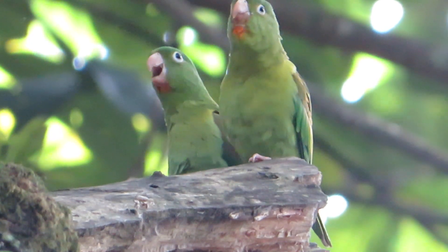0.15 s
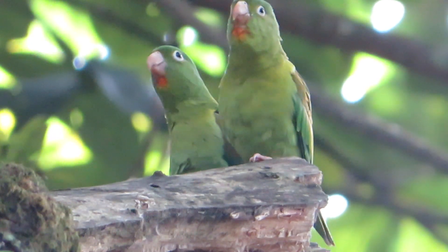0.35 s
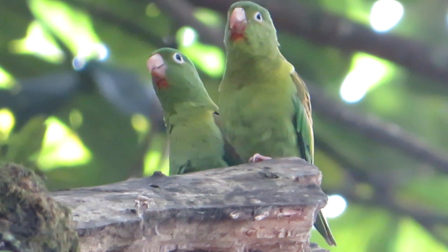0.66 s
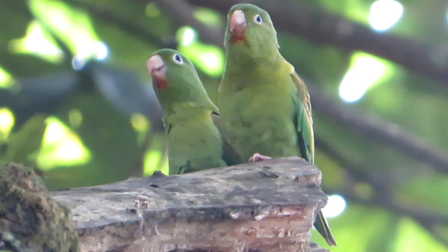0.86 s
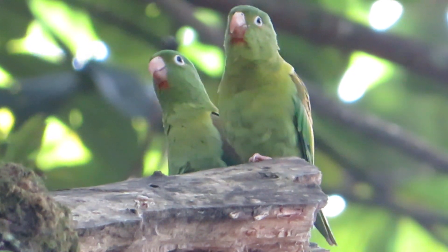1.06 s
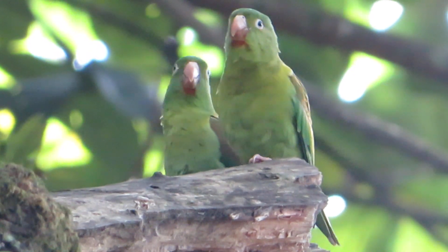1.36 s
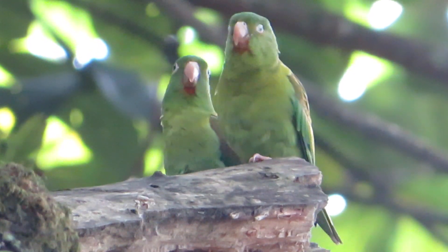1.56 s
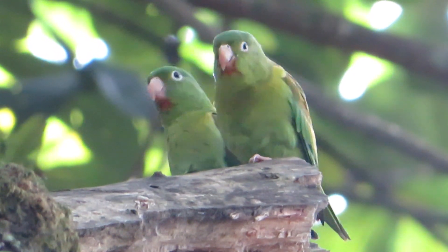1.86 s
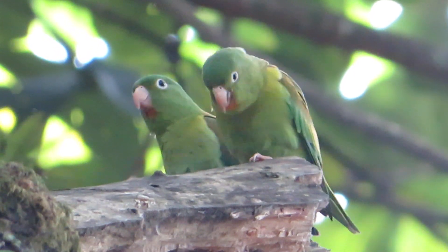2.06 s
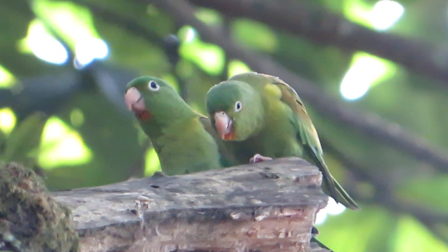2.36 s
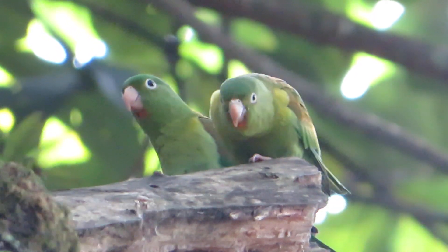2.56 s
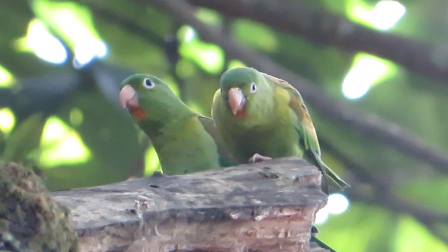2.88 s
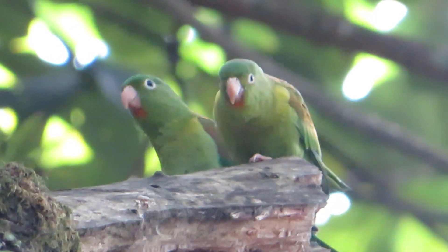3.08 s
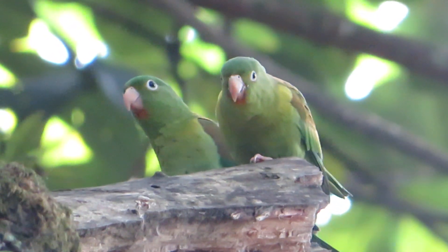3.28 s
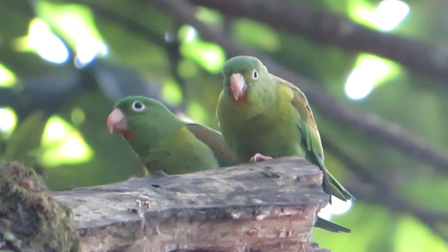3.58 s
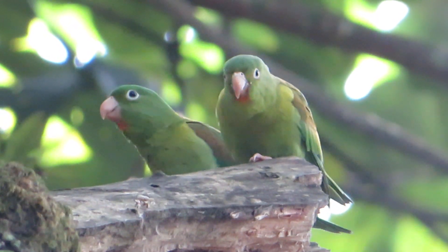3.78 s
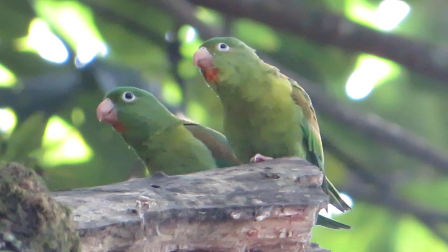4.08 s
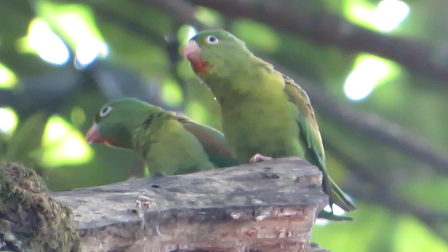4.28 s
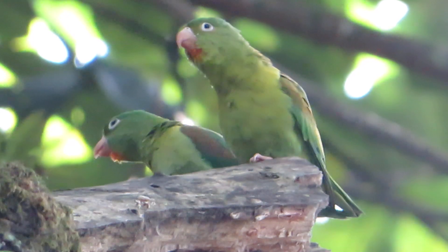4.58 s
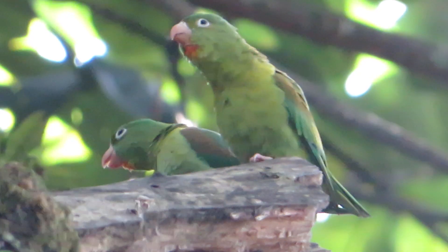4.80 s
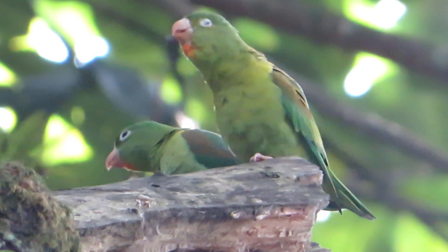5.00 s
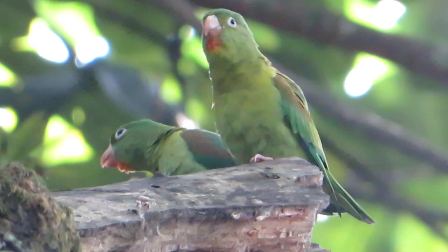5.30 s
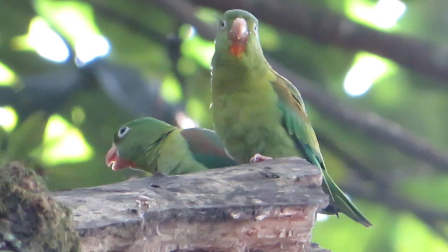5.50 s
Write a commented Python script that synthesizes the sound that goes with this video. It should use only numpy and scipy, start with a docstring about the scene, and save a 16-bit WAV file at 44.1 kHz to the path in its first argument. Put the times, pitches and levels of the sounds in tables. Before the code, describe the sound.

Small parakeets give harsh raspy screeches, shrill yelps and a long thin whistle in an echoing forest, over a soft low rumble.

```python
"""Small parakeets in a forest, over a low rumble with a slowly fading drone and a soft wash of air. First come a
far screech, low nasal calls and soft chirps in front, then harsh screeches and shrill yelps on the right. Thin
peeps, a click and far screeches lead to two more screeches; then faint hoots and more nasal calls, and on the
left a long whistle (with a click) and an arched squeal, as a last screech breaks out on the right. Each call is a
stack of harmonics, shaken when rough, shaped by a throat and scattered by the trees into a long tail of echoes."""
import sys
import numpy as np
from scipy import signal
from scipy.fft import rfft, irfft, next_fast_len
from scipy.io import wavfile

SR = 44100
rng = np.random.default_rng(int(sys.argv[2]) if len(sys.argv) > 2 else 0)


def materialize(psi):
    """Save the field psi as 16-bit PCM at rate SR to the path in sys.argv[1].

    A 1-D psi becomes a single channel; in a 2-D psi each row is a channel.
    """
    bounded = np.clip(np.atleast_2d(psi).T, -1, 1)
    quanta = np.round(bounded * 32767).astype(np.int16)
    wavfile.write(sys.argv[1], SR, quanta)


N = 249165
TIME = np.arange(N) / SR
SIDES = np.array([[1], [-1]]) / 2   # left, right


def from_db(db):
    """Turn decibels into a gain."""
    return 10 ** (np.asarray(db) / 20)


def rms_one(x):
    """Scale to an rms (average strength) of 1."""
    return x / np.sqrt(np.mean(x ** 2) + 1e-20)


def bin_hz(size):
    """Frequency of each bin of a real spectrum."""
    return np.arange(size // 2 + 1) * SR / size


def at_hz(points, hz):
    """Read a table between its points, on a log-frequency axis."""
    f, value = np.transpose(points)
    return np.interp(np.log(np.maximum(hz, 1)), np.log(f), value)


def wander(rate_hz, size):
    """Random motion of rms 1, weaker and weaker above the given rate."""
    smoothing = 1 + (bin_hz(size) / rate_hz) ** 2
    return rms_one(irfft(rfft(rng.standard_normal(size)) / smoothing, size))


# how alike sound from all round is on the left and right: (f/Hz, correlation)
LEFT_RIGHT_LIKENESS = [(30, .998), (60, 1), (130, 0.99), (270, 0.93), (1000, 0.96), (3000, 0.88),
                       (6000, 0.65), (12000, 0.48)]


def diffuse(spectrum, size):
    """Noise from all round at two nearby points: alike in the bass, less so in the treble."""
    hz = bin_hz(size)
    mid, side = rfft(rng.standard_normal((2, size)))
    alike = np.clip(at_hz(LEFT_RIGHT_LIKENESS, hz), 0, 1)
    pair = np.sqrt(1 + alike) * mid + np.sqrt(1 - alike) * side * [[1], [-1]]
    return rms_one(irfft(pair * from_db(at_hz(spectrum, hz)), size))


def tone(pitch, waver, waver_hz, swell_db):
    """A low sine whose pitch and level waver; rms 1."""
    phase = 2 * np.pi * np.cumsum(pitch * (1 + waver * wander(waver_hz, N))) / SR
    return rms_one(np.sin(phase) * from_db(swell_db * wander(waver_hz, N)))


# time for echoes to die by 60 dB: (f/Hz, t/s)
ECHO_DECAY = [(1000, 0.68), (3000, 1.02), (4500, 1.42), (7000, 0.8), (13000, 0.54)]


def forest_echo(early_db, early_s, gap_s, lumpy_db=1.5):
    """Trunks and leaves scatter sound: near echoes, then a tail that dies at its own pace in each band."""
    t = TIME[:SR]
    lumps = from_db(lumpy_db * wander(150, SR))
    scatter = diffuse([(1000, 4.0), (4300, 2.5), (6500, 1.0), (12000, 1.0)], SR) * lumps
    centres, hz = np.geomspace(1000, 14000, num=7), bin_hz(SR)
    tail = 0
    for centre, share in zip(centres, np.eye(len(centres))):
        band = irfft(rfft(scatter) * np.interp(hz, centres, share), SR)
        tail = tail + band * from_db(-60 * t / at_hz(ECHO_DECAY, centre))
    near_boost = 1 + from_db(early_db) * np.exp(-t / early_s)
    tail = tail * near_boost * (1 - np.exp(-t / gap_s))
    # unit gain from 2500 to 5000 Hz, where the birds are loudest
    return tail / np.sqrt(np.mean(np.abs(rfft(tail)[:, 2500:5000]) ** 2))


ECHO_LEAN = 0.45   # share of the caller's direction that its echoes keep


def place(x, echo, lead_us, pan_db, direct_db, echo_db):
    """Direct sound reaches the left earlier by lead_us; echoes come from all round, leaning the same way."""
    size = next_fast_len(N + SR)
    turn = 2j * np.pi * bin_hz(size) * SIDES * lead_us / 1e6
    direct = from_db(direct_db + pan_db * SIDES) * np.exp(turn)
    echo_gain = from_db(echo_db + ECHO_LEAN * pan_db * SIDES)
    scattered = echo_gain * np.exp(ECHO_LEAN * turn) * rfft(echo, size)
    return irfft(rfft(x, size) * (direct + scattered), size)[:, :N]


CUTOFF_HZ = 15100   # top of the harmonics and of the whole sound
WOBBLE, WOBBLE_HZ = 0.0298, 91.3   # slower pitch shake at full roughness: share of pitch, speed
PULSE_DB, PULSE_HZ = 2, 220   # level stutter of all harmonics together: depth at full roughness, speed


def syrinx(call, throat, jitter, jitter_hz, flutter_db, subtone):
    """A bird's voice box: harmonics; roughness shakes pitch and level and adds tones at half steps between."""
    start, pitch, level, rough = call
    size, rough = len(pitch), np.clip(rough, 0, 1)
    shake = jitter * wander(jitter_hz, size) + WOBBLE * wander(WOBBLE_HZ, size)
    phase = 2 * np.pi * np.cumsum(pitch * (1 + rough * shake)) / SR
    orders = np.arange(2, 25)[:, None] / 2   # 1, 1.5, 2 ... 12 times the pitch
    flutter = np.array([rms_one(from_db(flutter_db * rough * np.tanh(wander(jitter_hz, size))))
                        for _ in orders])
    weight = np.where(orders % 1, subtone * rough ** 2, 1) * (orders * pitch < CUTOFF_HZ)
    sines = np.sin(orders * phase + rng.uniform(0, 2 * np.pi, orders.shape))
    wave = np.sum(weight * flutter * sines, axis=0)
    wave = wave * rms_one(from_db(PULSE_DB * rough * np.tanh(wander(PULSE_HZ, size))))
    # make up beforehand for what the throat will do to the level
    passed = np.sqrt(np.sum((weight * from_db(at_hz(throat, orders * pitch))) ** 2, axis=0) / 2)
    soft_ends = signal.windows.tukey(size, min(1, 200 / size))
    source = wave / passed * from_db(level) * soft_ends
    # the extra second in front lets a call begin before time zero
    return np.pad(source, (SR + int(start * SR), N))[SR:SR + N]


def bird(calls, throat, jitter, jitter_hz, flutter_db, subtone):
    """All the calls of one voice, filtered by its throat and beak."""
    source = sum(syrinx(call, throat, jitter, jitter_hz, flutter_db, subtone) for call in calls)
    size = next_fast_len(N + 2000)
    return irfft(rfft(source, size) * from_db(at_hz(throat, bin_hz(size))), size)[:N]


FADE_DB = 15   # how far a note's level falls at its ends


def envelope_db(age, attack_s, release_s):
    """Attack, hold and release, in dB relative to the held level."""
    attack = np.maximum(0, 1 - age / attack_s)
    release = np.maximum(0, 1 - (age[-1] - age) / release_s)
    return -FADE_DB * (attack + release)


BOW_SKEW = .75   # below 1, the bend in a glide peaks early


def note(row, attack_s, release_s):
    """One glide bent like a bow, as (start, pitch, level, roughness)."""
    start, length, from_hz, to_hz, bow_hz, db, rough = row
    age = TIME[:int(length * SR)]
    along = age / length
    pitch = from_hz + (to_hz - from_hz) * along + bow_hz * np.sin(np.pi * along ** BOW_SKEW)
    return start, pitch, db + envelope_db(age, attack_s, release_s), np.full(len(age), rough)


BREAK_S = .0045   # between points closer than this the pitch jumps instead of gliding


def course(points):
    """A call that runs through its points of pitch, level and roughness; the pitch jumps at each break."""
    s, pitch, level, rough = np.transpose(sorted(points))
    t = s[0] + TIME[:int((s[-1] - s[0]) * SR)]
    last = np.searchsorted(s, t, side="right") - 1
    is_break = np.diff(s)[last] < BREAK_S
    pitch = np.where(is_break, pitch[last], np.interp(t, s, pitch))
    return s[0], pitch, np.interp(t, s, level), np.interp(t, s, rough)


# colour of the steady rumble: (f/Hz, relative level/dB per Hz)
RUMBLE_COLOUR = [(15, -30), (25, -20.5), (54, 1.5), (108, -1), (139, -2), (172, -8), (267, -9), (335, -14),
                 (470, -18.5), (500, -18.5), (650, -42), (1100, -120)]


def low_rumble(level_db=-38, swell_db=1.5, swell_hz=3):
    """Low noise from all round that swells gently at random."""
    return diffuse(RUMBLE_COLOUR, N) * from_db(level_db + swell_db * wander(swell_hz, N))


# course of the drone as it settles and fades: (t/s, f/Hz, level/dB)
DRONE_COURSE = [(0, 146.1, -41), (0.449, 158, -40), (0.748, 141.3, -43), (2.9, 141.1, -43),
                (4.1, 139.9, -55.5), (5.65, 146.7, -61)]
# colour of the low noise around it: (f/Hz, relative level/dB per Hz)
DRONE_NOISE_COLOUR = [(60, -30), (110, 0), (290, -3), (450, -30), (1100, -120)]


def fading_drone(noise_db=-4):
    """A wavering low sine, with low noise that fades along with it."""
    s, pitch, level = np.transpose(DRONE_COURSE)
    level_db = np.interp(TIME, s, level)
    drone = tone(np.interp(TIME, s, pitch), waver=0.0349, waver_hz=10.0, swell_db=2.0)
    hum = diffuse(DRONE_NOISE_COLOUR, N) * from_db(level_db + noise_db)
    return drone * from_db(level_db) + hum


# colour of the air: (f/Hz, relative level/dB per Hz)
AIR_COLOUR = [(350, 0.5), (600, 1.5), (1100, -1), (1600, -6.5), (2500, -9), (4000, -16), (6000, -21),
              (9000, -30.5), (12000, -39), (15000, -50)]


def air_wash(level_db=-43):
    """A soft wash of noise from all round, weaker toward the treble."""
    return diffuse([(100, -6.0)] + AIR_COLOUR, N) * from_db(level_db)


# faint far tones: (start t/s, length t/s, from f/Hz, to f/Hz, level/dB)
FAR_HOOTS = [(3.702, 0.37, 455, 445, -46.5), (4.05, .22, 472, 462, -49.5)]


def hoots(fade_s=0.035):
    """Wavering sines that sink a little in pitch, with a swell at the start and a fade at the end."""
    out = 0
    for start, length, from_hz, to_hz, db in FAR_HOOTS:
        pitch = np.interp(TIME, [start, start + length], [from_hz, to_hz])
        swell = np.clip(np.minimum(TIME - start, start + length - TIME) / fade_s, 0, 1)
        out = out + from_db(db) * swell * tone(pitch, waver=0.0041, waver_hz=8.6, swell_db=0.5)
    return out


def background(pan_db=0.7):
    """Rumble, drone and hoots a touch louder on the left, plus the air."""
    return (low_rumble() + fading_drone() + hoots()) * from_db(pan_db * SIDES) + air_wash()


# small dry clicks: (t/s, knock level/dB, snap level/dB)
CLICKS = [(2.260, -19.5, -28), (4.657, -45, -37)]


def clicks(knock_s=0.00025, snap_s=.0004, snap_top_hz=6000):
    """A snap of dying noise and a small dull one-way pulse, starting together."""
    out = np.zeros(N)
    for s, knock_db, snap_db in CLICKS:
        age = TIME[TIME >= s] - s
        burst = rng.standard_normal(len(age)) * np.exp(-age / snap_s)
        snap = signal.lfilter(*signal.butter(1, snap_top_hz, fs=SR), burst)
        knock = (age / knock_s * np.exp(1 - age / knock_s)) ** 2
        out[N - len(age):] += from_db(snap_db) * snap - from_db(knock_db) * knock
    return out


# Call tables below: levels are those before a call is placed; roughness above 1 counts as 1.
# low nasal calls: (start t/s, length t/s, from f/Hz, to f/Hz, bow f/Hz, level/dB, roughness 0-1)
NASAL_NOTES = [ (0.159, 0.052, 1020, 895, 109.5, -44, 0.14), (.222, 0.051, 993, 953, -10, -47, 0.39),
               (.485, 0.048, 950, 784, 21.5, -47, .4), (3.928, 0.03, 1077, 960, -15.5, -47.5, 0.2),
               (4.302, 0.06, 1045, 1020, 17, -49.5, 0.22), (4.362, 0.039, 1011, 899, 7.5, -51.5, .3),
               (4.680, 0.051, 1024, 1046, 35.5, -48, 0.35), (5.028, 0.04, 1037, 977, 1, -47.5, 0.31),
               (5.07, .06, 999, 896, 29.5, -43.5, 0.63), (5.143, 0.032, 1038, 986, -9, -42.5, 0.22),
               (5.2, 0.074, 1000, 1000, 12.5, -50.5, 0.35), (5.322, 0.057, 1063, 1075, 23.5, -45.5, 0.25)]
# what the throat and beak let through: (f/Hz, level/dB)
NASAL_FILTER = [(1000, -7), (1700, -9), (2050, 3), (3100, 4), (4100, -3.5), (5000, -13.5), (6200, -13),
                (7200, -25), (12000, -39)]


def nasal_calls(echo):
    """Short low glides from further off, whose upper harmonics the throat favours."""
    calls = bird([note(row, attack_s=0.0054, release_s=0.0018) for row in NASAL_NOTES],
                 NASAL_FILTER, jitter=0.058, jitter_hz=400, flutter_db=17.0, subtone=1.0)
    return place(calls, echo, lead_us=5, pan_db=0.0, direct_db=4.0, echo_db=6.0)


# screeches from deeper in the trees, each a list of (t/s, f/Hz, level/dB, roughness)
FAR_COURSES = [
    [(-.012, 2051, -44, 0.4), (0, 2024, -33, 0.47), (.03, 2010, -41.5, 0.44), (.057, 2060, -47, 1.5)],
    [(2.535, 1250, -55, 0.3), (2.572, 1400, -48, 0.5), (2.575, 2120, -43, 0.21), (2.603, 2044, -44, 0.34),
     (2.606, 1400, -46.5, 0.48), (2.64, 1306, -49, 0.56)],
    [(2.76, 1320, -51, .45), (2.8, 1420, -47, 0.5), (2.803, 2095, -42, 0.28), (2.84, 2018, -44, 0.5),
     (2.881, 2037, -46.5, 0.6), (2.884, 1454, -47, 0.41), (2.934, 1360, -43.5, 0.33)],
    [(5.235, 1970, -49, 0.3), (5.255, 2018, -46, .25), (5.31, 2002, -44, .2), (5.325, 2000, -48, .3)],
]
# what the throat and beak let through: (f/Hz, level/dB)
FAR_FILTER = [(1000, -17), (1500, -11), (2050, -2), (2400, 4), (2900, 7), (3500, 9), (4100, 4), (4900, 5),
              (6200, -10), (7000, -13), (8200, -18.5), (12000, -36)]


def far_screeches(echo):
    """Rough far cries, some with breaks in pitch, whose echoes are louder than their direct sound."""
    calls = bird([course(points) for points in FAR_COURSES],
                 FAR_FILTER, jitter=0.088, jitter_hz=424, flutter_db=14.0, subtone=1.0)
    return place(calls, echo, lead_us=4, pan_db=0.0, direct_db=0.5, echo_db=4.5)


# thin high peeps: (start t/s, length t/s, from f/Hz, to f/Hz, bow f/Hz, level/dB, roughness 0-1)
PEEP_NOTES = [(2.064, 0.042, 3950, 4280, 400, -50, 0.58), (2.228, 0.072, 2654, 2760, 240, -51, 0.18),
              (2.288, 0.062, 2830, 2800, 110, -54, 0.2), (4.230, 0.041, 4900, 4230, 80, -56.5, 0.31)]
# what the throat and beak let through: (f/Hz, level/dB)
PEEP_FILTER = [(2800, 0), (4500, -6.5), (5900, 4.5), (9200, -11), (11500, -25), (15000, -50)]


def far_peeps(echo):
    """Short, high bowed glides from afar."""
    calls = bird([note(row, attack_s=0.012, release_s=0.014) for row in PEEP_NOTES],
                 PEEP_FILTER, jitter=0.057, jitter_hz=254, flutter_db=27.0, subtone=0.35)
    return place(calls, echo, lead_us=28, pan_db=-1.0, direct_db=0.0, echo_db=1.5)


# soft chirps: (start t/s, length t/s, from f/Hz, to f/Hz, bow f/Hz, level/dB, roughness 0-1)
CHIRP_NOTES = [(0.299, 0.029, 2905, 1934, -270, -37.5, .34), (.355, 0.014, 1693, 2280, -60, -40, .4),
               (.364, 0.036, 2466, 2130, 70, -45, 0.32), (0.401, .034, 1863, 1545, -49, -38.5, 0.34)]
# what the throat and beak let through: (f/Hz, level/dB)
CHIRP_FILTER = [(1500, -5), (2400, -10), (2800, -7), (3400, 11), (4300, -2.5), (5400, -5.5), (6300, -15.5),
                (7500, -18), (9000, -22), (11500, -29), (13000, -37), (15000, -45)]


def soft_chirps(echo):
    """Quick glides, most of them falling, from the perched pair in front."""
    calls = bird([note(row, attack_s=0.0041, release_s=0.0031) for row in CHIRP_NOTES],
                 CHIRP_FILTER, jitter=0.027, jitter_hz=400, flutter_db=2.0, subtone=0.52)
    return place(calls, echo, lead_us=13.0, pan_db=0.0, direct_db=3.0, echo_db=2.5)


# long pure whistle: (t/s, f/Hz, level/dB)
WHISTLE_COURSE = [(4.459, 3240, -44), (4.474, 3587, -33), (4.497, 3704, -43.5), (4.526, 3565, -28.5),
                  (4.58, 3448, -31), (4.654, 3417, -30.5), (4.778, 3597, -31), (4.807, 3645, -41),
                  (4.906, 3613, -34.5), (4.975, 3820, -32), (4.981, 3870, -28)]
# its last note: (start t/s, length t/s, from f/Hz, to f/Hz, bow f/Hz, level/dB, roughness 0-1)
WHISTLE_LAST_NOTE = (4.982, .06, 4430, 4500, 240, -29.5, .08)
# what the throat and beak let through: (f/Hz, level/dB)
WHISTLE_FILTER = [(3000, 12), (4700, -24.5), (7000, -21), (9400, -46), (11000, -27.5), (13000, -65)]


def long_whistle(echo, rough=0.036):
    """A held, nearly pure tone on the left that sags, climbs again and flips up into one last note."""
    held = bird([course([(*point, rough) for point in WHISTLE_COURSE])],
                WHISTLE_FILTER, jitter=0.073, jitter_hz=200, flutter_db=21.0, subtone=.1)
    last_note = bird([note(WHISTLE_LAST_NOTE, attack_s=0.0082, release_s=0.032)],
                     WHISTLE_FILTER, jitter=0.047, jitter_hz=200, flutter_db=15.0, subtone=.1)
    return (place(held, echo, lead_us=51.0, pan_db=3.0, direct_db=0.0, echo_db=-8.5)
            + place(last_note, echo, lead_us=51.4, pan_db=2.5, direct_db=-1.0, echo_db=-11.5))


# arched squeal: (start t/s, length t/s, from f/Hz, to f/Hz, bow f/Hz, level/dB, roughness 0-1)
SQUEAL_NOTES = [(5.329, .106, 2797, 2376, 518, -30, 0.15)]
# what the throat and beak let through: (f/Hz, level/dB)
SQUEAL_FILTER = [(2400, -8), (3200, -11), (4800, -5), (6400, -9), (7600, -11), (9500, -22), (13000, -42)]


def arched_squeal(echo):
    """A note on the left that arches up in pitch and sinks again."""
    calls = bird([note(row, attack_s=0.018, release_s=0.014) for row in SQUEAL_NOTES],
                 SQUEAL_FILTER, jitter=0.042, jitter_hz=300, flutter_db=23.0, subtone=.3)
    return place(calls, echo, lead_us=46, pan_db=2.0, direct_db=0.0, echo_db=-5.0)


FLIP_RATIO, FLIP_DB, FLIP_ROUGH = 1.32, 5.5, 0.16   # flipped-up voice: pitch ratio, added level, roughness


def yelp(row, attack_s, release_s):
    """A note that slides for a moment into a higher, louder, cleaner register and drops back at once."""
    *glide, flip_after, flip_s, slide_s = row
    start, pitch, level, rough = note(glide, attack_s, release_s)
    since = TIME[:len(pitch)] - flip_after
    up = np.clip(since / slide_s + .5, 0, 1) * (since < flip_s)
    return start, pitch * FLIP_RATIO ** up, level + up * FLIP_DB, rough + up * (FLIP_ROUGH - rough)


# shrill yelps: (start t/s, length t/s, from f/Hz, to f/Hz, bow f/Hz, level/dB, roughness 0-1,
#                middle of the flip's slide after the start t/s, from there to the drop back t/s, slide t/s)
YELP_NOTES = [(.992, .096, 1969, 2702, 190, -32, 0.44, .029, .02, 0.0145),
              (1.246, .1, 2263, 2542, -170, -36, 0.27, .029, .021, 0.0045)]
# what the throat and wide-open beak let through: (f/Hz, level/dB)
YELP_FILTER = [(2000, -5.5), (3000, -4), (4200, 2), (5200, 0.5), (6100, -3), (7400, -5), (8500, -25),
               (10000, -14), (11800, -27), (13500, -39)]


def shrill_yelps():
    """Yelps with the beak wide open."""
    return bird([yelp(row, attack_s=0.02, release_s=0.0061) for row in YELP_NOTES],
                YELP_FILTER, jitter=0.06, jitter_hz=450, flutter_db=18.0, subtone=0.49)


RASP_HZ, RASP_RATIO = 87, 1.43   # flips a second, pitch of the shrill register over the cry
RASP_SNAP, RASP_BIAS, RASP_UNEVEN = 1.3, .35, .09   # steepness, lean to the low register, scatter in turns
# throat and beak in a screech: (f/Hz, level/dB with the beak nearly shut, level/dB wide open)
SCREECH_FILTER = [(1000, -11, -21), (1510, -9.5, -3), (2250, -9.5, -10.5), (2530, -10.5, -8.5),
                  (3050, 1.5, -0.5), (3560, 5.5, 3.5), (4390, 3.5, -1), (4920, -7, -3.5), (5500, -8, -6.5),
                  (6130, -5.5, -11), (6600, -13.5, -9), (8270, -15.5, -13.5), (10000, -26, -19),
                  (11500, -20.5, -24), (13600, -53, -44)]


def screech(opening, rasp_s, points):
    """One harsh burst: beak opening blends two throat shapes; in the rasp the voice flips between registers."""
    opening = np.clip(opening, 0, 1)
    throat = [(hz, shut + opening * (wide - shut)) for hz, shut, wide in SCREECH_FILTER]
    start, pitch, level, rough = course(points)
    since = np.maximum(0, start + TIME[:len(pitch)] - rasp_s)
    turns = since * RASP_HZ + RASP_UNEVEN * wander(RASP_HZ, len(pitch)) * (since > 0)
    up = np.clip(.5 - RASP_SNAP * np.cos(2 * np.pi * turns) - RASP_BIAS, 0, 1)
    call = (start, pitch * RASP_RATIO ** up, level, rough)
    return bird([call], throat, jitter=0.05, jitter_hz=426, flutter_db=10.0, subtone=1.0)


# growl, swerving cry, shrill flips, rasp: (beak opening 0-1, start of rasp t/s,
#                                          list of (t/s, f/Hz, level/dB, roughness 0-1))
SCREECH_BURSTS = [ (0.06, .744, [(.666, 1342, -32, 0.65), (.676, 1392, -28.5, 0.35), (.692, 1491, -26, .35),
                  (.695, 2228, -20.5, 0.27), (.712, 2005, -25.5, 0.3), (.722, 1693, -19, 0.5),
                  (.731, 2121, -19.5, 0.27), (.743, 2134, -25, 0.35), (.758, 2123, -25.5, 0.32),
                  (.775, 2100, -28.5, 0.34), (.79, 2025, -28, .4), (.804, 2060, -39, .6)]),
                  (0.086, .924, [(.842, 1405, -32, 0.5), (.866, 1539, -29, 0.16), (.869, 2185, -33, 0.66),
                  (.879, 2090, -26, .4), (.886, 1678, -25, 0.27), (.89, 2048, -28, 0.44),
                  (.905, 2008, -29, .75), (.926, 2041, -27.5, 0.31), (.946, 2004, -29, 0.54),
                  (.954, 2020, -38, 0.5)]), (0.33, 1.204, [(1.11, 1350, -31, 0.4), (1.132, 1560, -33, 0.49),
                  (1.143, 1877, -29.5, 0.5), (1.147, 2860, -27, .4), (1.152, 2612, -27.5, 0.4),
                  (1.156, 1947, -29, 0.52), (1.167, 1956, -30, 0.8), (1.17, 2754, -30, 0.4),
                  (1.177, 2742, -26.5, 0.46), (1.179, 1848, -31, 0.5), (1.194, 1773, -24.5, 0.4),
                  (1.203, 1800, -31.5, 0.33), (1.222, 1826, -32, 0.4)]),
                  (0.23, 2.987, [(2.948, 1096, -39, 0.3), (2.962, 1372, -32, 0.35),
                  (2.972, 1457, -31, 0.29), (2.974, 1883, -28, 0.36), (2.982, 2128, -28, 0.4),
                  (3.005, 2096, -28, .4), (3.024, 2107, -28, 0.42), (3.048, 2080, -32, 0.53),
                  (3.06, 2120, -38, 0.7)]), (1, 3.245, [(3.146, 1085, -37, 0.4), (3.158, 1522, -30, 0.5),
                  (3.173, 1630, -30.5, 0.32), (3.181, 2110, -21.5, 0.3), (3.188, 2178, -25.5, 0.3),
                  (3.191, 2806, -27.5, 0.3), (3.201, 2354, -24, 0.33), (3.205, 2820, -29, 0.26),
                  (3.208, 2177, -23.5, 0.27), (3.219, 2326, -26, 0.14), (3.228, 2266, -25, 0.4),
                  (3.23, 3184, -25.5, 0.15), (3.24, 3016, -27, 0.38), (3.244, 2280, -35, 0.7),
                  (3.265, 2220, -46, 0.77)]), (.05, 5.479, [(5.386, 1386, -32, 0.9),
                  (5.405, 1501, -27, 0.53), (5.416, 1530, -24, 0.64), (5.428, 1411, -31, 0.6),
                  (5.431, 1770, -21, 0.58), (5.438, 1760, -22, 0.5), (5.442, 2206, -19.5, 0.47),
                  (5.449, 2188, -20, .55), (5.457, 1900, -23, 0.6), (5.461, 3268, -20.5, 0.6),
                  (5.472, 2995, -22.5, 0.35), (5.476, 2084, -22, 0.43), (5.49, 2105, -23.5, .5),
                  (5.515, 2110, -24.5, 0.63), (5.545, 2076, -35, .7)])]


def screeching_bird(echo):
    """The main bird, on the right: its screeches and yelps from one perch."""
    calls = sum(screech(*row) for row in SCREECH_BURSTS) + shrill_yelps()
    return place(calls, echo, lead_us=-38.0, pan_db=-2.0, direct_db=-1.0, echo_db=-3.5)


def scene():
    """Birds near and far over the forest background."""
    echo = forest_echo(early_db=-5.5, early_s=0.031, gap_s=0.0025)
    far_echo = forest_echo(early_db=-27, early_s=0.02, gap_s=0.00077)
    far_birds = nasal_calls(far_echo) + far_screeches(far_echo) + far_peeps(far_echo)
    left_bird = long_whistle(echo) + arched_squeal(echo)
    near_birds = soft_chirps(echo) + left_bird + screeching_bird(echo)
    return background() + clicks() + far_birds + near_birds


def record(dry):
    """A steep filter cuts the top of the treble."""
    return signal.sosfilt(signal.ellip(10, .1, 80, CUTOFF_HZ, fs=SR, output="sos"), dry)


dry = scene()
out = record(dry)
materialize(out)
```